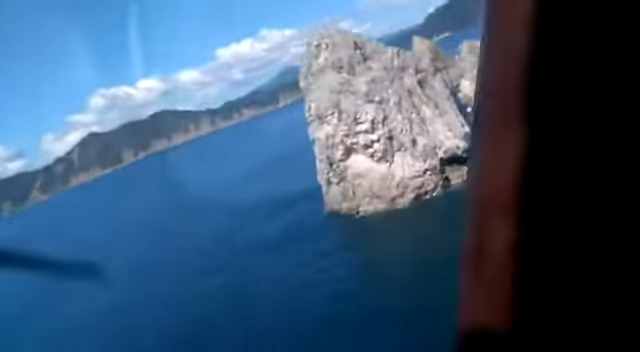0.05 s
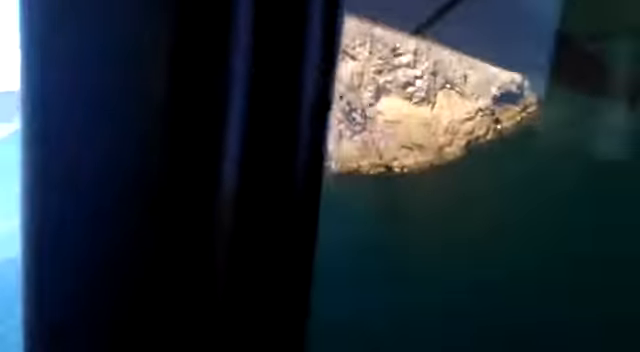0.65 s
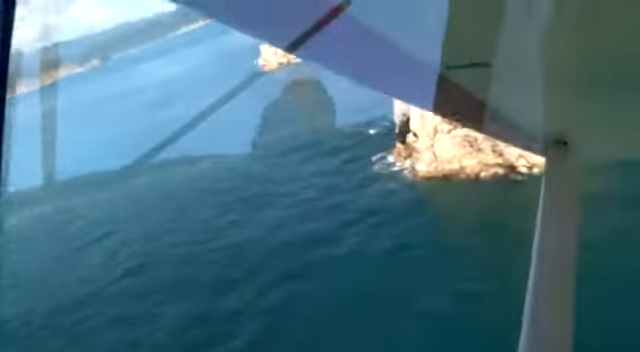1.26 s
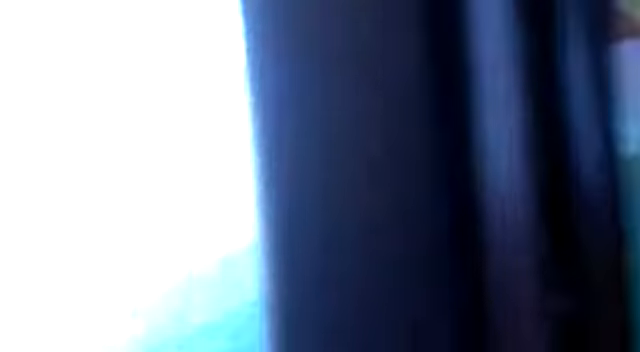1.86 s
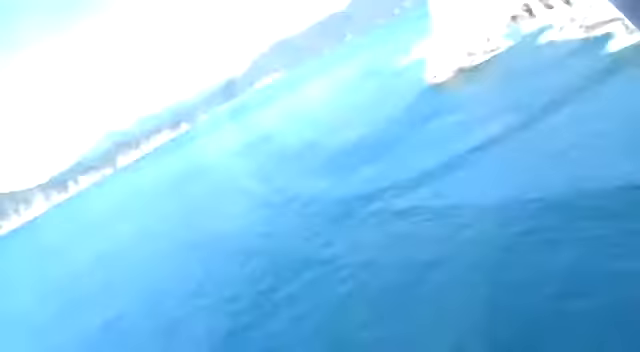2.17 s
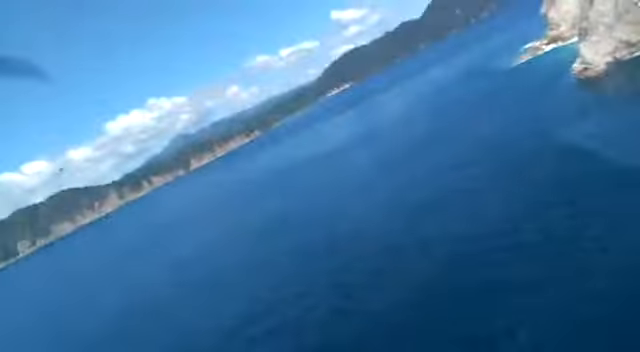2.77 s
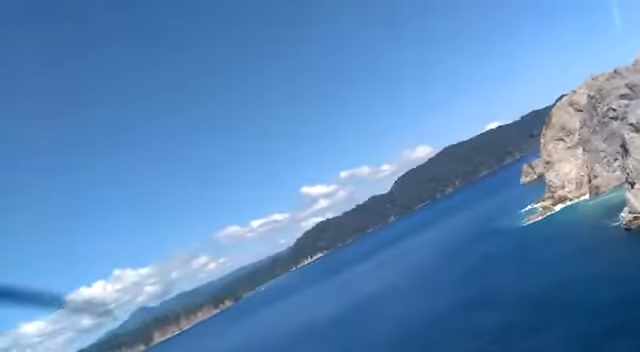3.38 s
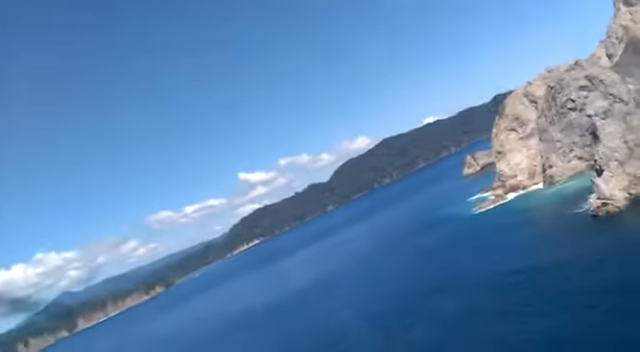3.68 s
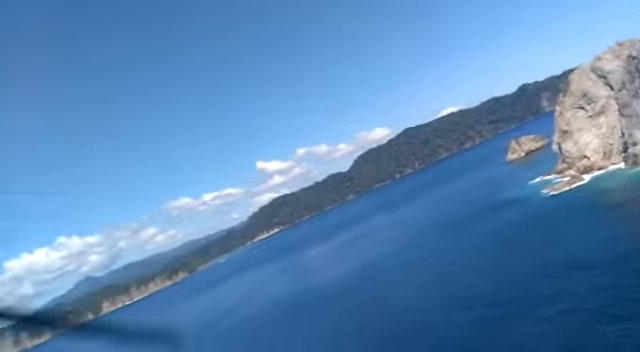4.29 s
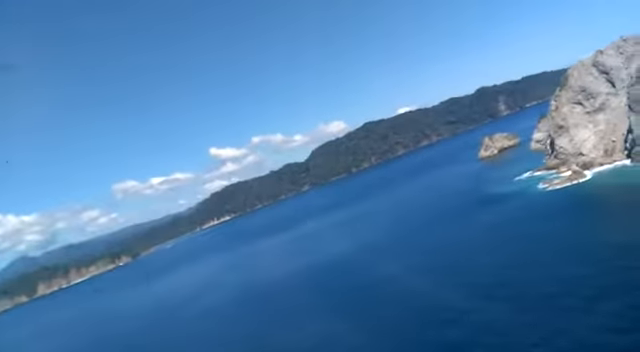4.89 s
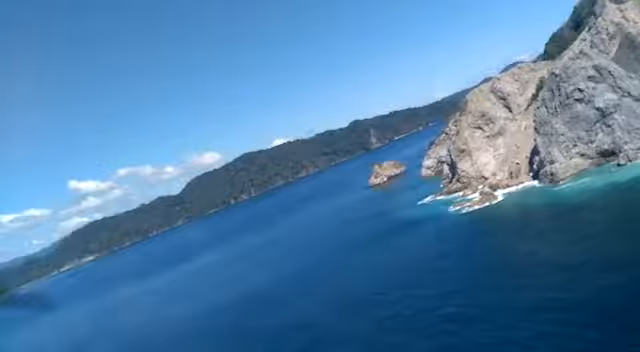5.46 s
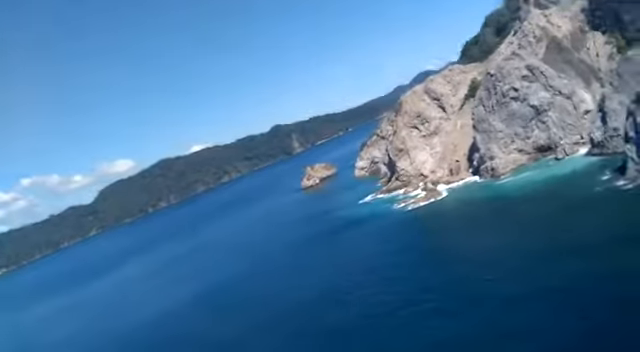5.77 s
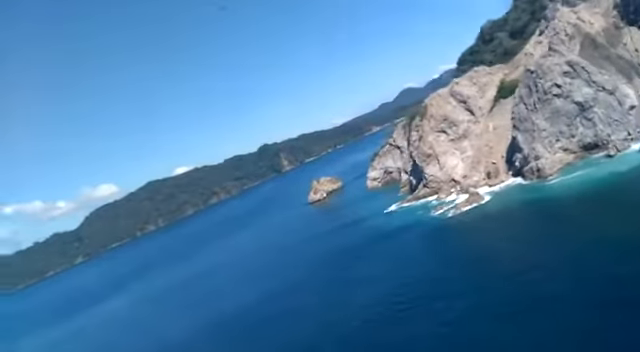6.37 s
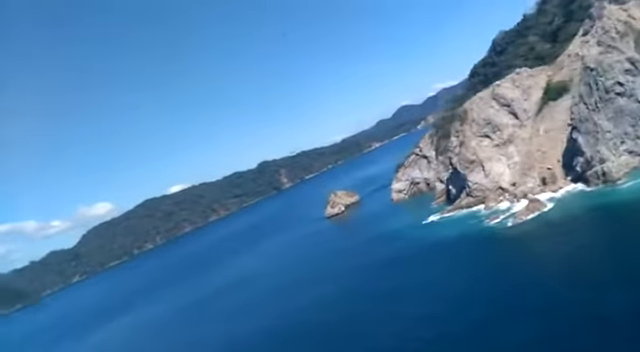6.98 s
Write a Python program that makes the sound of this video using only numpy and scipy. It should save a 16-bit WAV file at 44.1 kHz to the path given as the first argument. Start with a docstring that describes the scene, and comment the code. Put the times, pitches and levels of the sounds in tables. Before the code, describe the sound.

Loud, steady propeller drone heard from inside a light aircraft, with fluttering air rush against the cabin and a faint window hiss.

```python
"""Inside a light aircraft in a banked cruise. From the start a four-cylinder engine and its propeller
boom through the cabin's standing waves, propeller wash buffets the skin and a thin whine comes and goes.
Near 2.2 s the wash slaps hardest and the exhaust rasp drops away. By 2.6 s the microphone has swung to a
second window, where the seal hisses louder, and the rasp returns. The engine speed sags slightly to the
end. Throughout, a fast limiter holds the peaks down."""
import sys
import numpy as np
from scipy import signal
from scipy.io import wavfile
from scipy.ndimage import uniform_filter1d, minimum_filter1d

SR = 44100
rng = np.random.default_rng(int(sys.argv[2]) if len(sys.argv) > 2 else 0)


def to_wav(s):
    """Save 16-bit WAV."""
    ch = np.atleast_2d(s).T  # columns
    pcm = np.round(np.clip(ch, -1, 1) * 32767)  # PCM
    wavfile.write(sys.argv[1], SR, pcm.astype(np.int16))


N = 319284

# engine firing rate: t/s, f/Hz
FIRING_RATE = [(0, 77.35), (1, 77.3), (2, 76.7), (3, 76.3), (4, 75.95), (5, 75.8), (6, 75.55), (7.24, 75.1)]
# coherence of the cabin's sound field: f/Hz, left-right correlation/1
COHERENCE = [(30, 0.84), (70, 0.8), (170, 0.95), (270, 0.94), (450, 0.7), (740, 0.29), (1200, -0.22),
             (2000, -0.019), (15000, -0.012)]
# swing of the low rumble: t/s, level/dB
RUMBLE_SWING = [(0.0, 1.0), (0.2, 1), (0.68, -4.5), (1.04, 1), (1.44, -3), (2.8, -3.5), (2.92, -1),
                (3.48, 0), (3.76, -4.5), (5.16, 0), (5.32, -6), (5.48, -0.5), (6.04, -1.5), (6.32, -1),
                (6.72, -0.5), (6.88, 1), (7.08, -0.5), (7.24, 1)]


def boom(firings, window, second_db=-27, rumble_follow=2.2, fourth_db=(-45, -16.5)):
    """Standing waves: the lowest four firing harmonics swell and fade as the microphone crosses them."""
    # fundamental: t/s, level/dB
    fundamental = [(0.0, -14.5), (0.92, -13), (1.24, -16.5), (1.36, -16), (2.4, -5.5), (2.52, -11),
                   (3.44, -12), (3.52, -21), (3.64, -9.5), (3.96, -16.5), (4.08, -8.5), (5.92, -9),
                   (6.08, -1.5), (6.2, -12), (6.72, -6), (6.92, -10), (7.12, -8.5), (7.24, -10.5)]
    # third harmonic: t/s, level/dB
    third = [(0.0, -7), (1.12, -12), (1.2, -8.5), (1.76, -9.5), (2.28, -14), (2.6, -11.5), (3.84, -14),
             (4.08, -29), (4.2, -9), (4.36, -30), (4.44, -13), (4.64, -20), (4.88, -9), (5.6, -17),
             (5.84, -11.5), (6.04, -16.5), (7.0, -10.5), (7.24, -22)]
    flutter_db, wander_db = 1.5, 1.25
    levels_db = [in_time(fundamental)[0],
                 second_db + rumble_follow * in_time(RUMBLE_SWING)[0] + wander_db * drift(2.5),
                 in_time(third)[0],
                 np.interp(window, [0, 1], fourth_db) + wander_db * drift(2.2)]
    out = 0
    for k, level_db in enumerate(levels_db, 1):
        gain = from_db(level_db + flutter_db * drift(10.0))
        out = out + gain * np.sin(2 * np.pi * (k * firings + rng.random()))
    return np.sqrt(2) * out


def lope(firings, flutter_db=3.0, scatter_rad=0.38, count=58):
    """Subharmonics: unequal cylinders repeat every fourth firing, adding tones between the harmonics."""
    # spectral envelope of these tones: f/Hz, level/dB
    spectrum = [(19, -29), (38, -34), (57, -24.5), (95, -26.5), (135, -24.5), (170, -36.5), (210, -24.5),
                (250, -27), (290, -28.5), (360, -31), (400, -25.5), (480, -34.5), (570, -31), (800, -39),
                (900, -37.5), (1100, -49.5)]
    out = 0
    for k in range(1, count):
        if k % 4:
            hz = k * FIRING_RATE[0][1] / 4
            phase = 2 * np.pi * (k * firings / 4 + rng.random())
            gain = from_db(at_hz(spectrum, hz)[0] + flutter_db * drift(0.97))
            out = out + gain * np.sin(phase + scatter_rad * drift(7.6))
    return out


def exhaust_rasp(firings, flutter_db=2.46, scatter_rad=0.32):
    """Multipath interference: high harmonics flutter and reach each channel in a phase of its own."""
    # exhaust harmonics at mid-scene: order/1, left level/dB, right level/dB, trend/(dB/s)
    harmonics = [(5, -15, -24, -0.18), (6, -23, -29, 0.5), (7, -26, -30.5, -1), (8, -21, -23.5, 1),
                 (9, -35, -34.5, 3.5), (10, -26.5, -26.5, -1.4), (11, -35, -39, 0.5), (13, -28, -49, 1)]
    # how openly the exhaust reaches the microphone: t/s, gain/dB
    exposure = [(0, -1), (1.2, -10.5), (2.0, -8), (2.35, -30), (2.7, -1.5), (4, 0), (5.5, -0.5), (7.24, 0)]
    out, from_middle_s = 0, (np.arange(N) - N / 2) / SR
    for k, left_db, right_db, trend in harmonics:
        coherence = at_hz(COHERENCE, k * FIRING_RATE[0][1])
        phase_gap = np.arccos(coherence) * rng.choice([-1, 1])
        phase = 2 * np.pi * (k * firings + rng.random()) + scatter_rad * drift(19.0)
        gain = from_db([[left_db], [right_db]]) * from_db(trend * from_middle_s + flutter_db * drift(6))
        out = out + gain * np.sin(phase + phase_gap * [[.5], [-.5]])
    return np.sqrt(2) * from_db(in_time(exposure)[0]) * out


def slipstream(flow_db, throb_db, window, patchy_db=2.13, count=30):
    """Boundary-layer noise: turbulence on the skin drives bands that each flicker on their own."""
    # air noise at the first window: f/Hz, left and right spectrum level/dB in 1 Hz
    first_spectrum = [(32, -58, -54), (55, -61, -62), (100, -40.5, -50), (200, -40, -34), (314, -50, -43),
                      (424, -38.5, -42.5), (730, -45.5, -48), (1040, -49, -58.5), (1290, -52, -57),
                      (1960, -65.5, -61.5), (3380, -69.5, -67), (4400, -66, -68.5), (5130, -75.5, -66.5),
                      (7450, -77.5, -82.5), (15500, -89, -94)]
    # air noise at the second window: f/Hz, left and right spectrum level/dB in 1 Hz
    second_spectrum = [(32, -67, -51), (55, -37, -28.5), (100, -38.5, -40), (243, -33, -35),
                       (494, -42, -52.5), (610, -43, -43), (860, -48, -56.5), (1164, -52, -56),
                       (2020, -67, -64.5), (2970, -71, -63.5), (3480, -69.5, -69.5), (5320, -76, -65.5),
                       (8250, -76, -80), (11000, -81.5, -84.5), (15500, -88.5, -96)]
    # the four registers: rumble, roar, rush, hiss
    register_hz, throb_depth = [280, 600, 2200, 7000], [0.39, 0.7, 0.64, 0.48]
    edges = np.r_[np.geomspace(25, 400, 7)[:-1], np.geomspace(400, 17000, count)]
    white, out = rng.standard_normal((2, 2, N)), 0
    for k, (low, high) in enumerate(zip(edges, edges[1:])):
        hz = np.sqrt(low * high)
        mid, side = noise_band(white[k % 2], low, high)
        coherence = at_hz(COHERENCE, hz)
        band = np.sqrt(1 + coherence) * mid + np.sqrt(1 - coherence) * side * [[1], [-1]]
        first, second = from_db(at_hz(first_spectrum, hz)), from_db(at_hz(second_spectrum, hz))
        density = (1 - window) * first + window * second
        # each band follows its nearest registers
        shares = np.array([np.interp(np.log(hz), np.log(register_hz), row) for row in np.eye(4)])
        swell_db = shares @ flow_db + shares @ throb_depth * throb_db
        flicker_db = patchy_db * (1 - .5 * shares[-1]) * drift(11.5)
        out = out + density * np.sqrt(high - low) * from_db(swell_db + flicker_db) * band
    return out


def flow_levels(leak_db, eddy_db=1.24):
    """Flow noise grows with the flow: swings in dB of roar, rush and hiss, and the rumble's own swing."""
    # strength of the airflow over the skin: t/s, level/dB
    airflow = [(0.0, 0), (0.72, 2), (0.8, -4.5), (0.92, 2.5), (1.68, 3), (1.76, -1.5), (2.04, 3),
               (2.36, -3.5), (2.64, 0), (3.0, -1.5), (3.08, 2.5), (3.88, 0), (4.64, -1), (4.76, 4.5),
               (4.88, -1), (5.56, 0), (5.84, 0.5), (7.24, 3)]
    flow_db = in_time(airflow)[0] + eddy_db * drift(0.9)
    rumble_db = in_time(RUMBLE_SWING)[0] - 0.5
    roar_db = 0.97 * flow_db - 1.0
    rush_db = 0.72 * flow_db
    hiss_db = 0.55 * flow_db + 0.26 * (leak_db - leak_db.mean())
    return np.array([rumble_db, roar_db, rush_db, hiss_db])


def buffeting(firings, crank_rad=1.75, blade_db=0.57, double_db=4.0, gust_db=3.0):
    """Amplitude modulation, in dB, of air noise by engine cycle, blade wakes, turbulence and slaps."""
    # throb at the engine cycle: t/s, signed depth/dB
    cycle_depth = [(0, -0.4), (1.7, 0.3), (2.22, 7.5), (2.4, 11), (2.55, 3.5), (7.24, -4.5)]
    phase = 2 * np.pi * firings
    cycle_db = in_time(cycle_depth)[0] * np.cos(phase / 4 + crank_rad)
    wake_db = blade_db * np.cos(phase) + double_db * np.cos(2 * phase)
    return cycle_db + wake_db + gust_db * drift(78) + slaps()


def slaps(lull_db=6.0, decay_s=0.0097):
    """Unsteady loading: the propeller wash slackens, then hits the skin; a modulation in dB."""
    # the hardest slaps: t/s, lift/dB
    hits = [(0.318, 0), (0.833, 6), (1.071, 7), (1.327, 5.5), (1.569, -3), (1.817, 2), (1.985, 9),
            (2.248, 21), (2.458, 13), (3.04, 8), (3.303, 14), (5.894, -1), (6.161, 13), (6.349, 2),
            (6.692, 9), (6.904, 5)]
    out, reach = np.zeros(N), int(.1 * SR)
    age = np.arange(-reach, reach) / SR
    fade = np.exp(-np.abs(age) / decay_s)
    for s, lift_db in hits:
        at = round(s * SR)
        out[at - reach:at + reach] += fade * np.where(age < 0, -lull_db, lift_db)
    return uniform_filter1d(out, size=60)


def seal_hiss(leak_db, window, flutter_db=2.0, left_db=-17, right_db=2.0, distance_db=-9):
    """Resonance: air leaking past the second window excites a few fluttering peaks, on the right."""
    # resonances of the leak: f/Hz, bandwidth/Hz, relative level/dB
    resonances = [(4960, 760, -5), (5070, 310, -4.5), (5550, 270, -1), (6030, 780, -10)]
    hiss = 0
    for hz, width, level_db in resonances:
        gain = from_db(level_db + flutter_db * drift(24))
        hiss = hiss + gain * noise_band(rng.standard_normal((2, N)), hz - width / 2, hz + width / 2)
    return from_db([[left_db], [right_db]]) * from_db(leak_db + distance_db * (2 - window)) * hiss


def cabin_reflections(air, echo_gain=.16, sway_s=.0002, count=3):
    """Comb filtering: glass and panels reflect the treble along paths that sway with the hand."""
    treble = signal.sosfilt(signal.butter(2, 900, "high", fs=SR, output="sos"), air)
    n, out = np.arange(N), air.copy()
    for channel in range(2):
        for lag_s in rng.uniform(.002, .007, count):
            delay = SR * (lag_s + sway_s * drift(0.65))
            out[channel] += echo_gain * np.interp(n - delay, n, treble[channel])
    return out


def whistles():
    """Flow-excited resonance: gusts blow across gaps in the frame, each band swelling and dying."""
    # gusts: t/s, duration/s, f/Hz, bandwidth/Hz, left level/dB, right level/dB
    gusts = [(0.146, 0.39, 2060, 700, -22.5, -50), (1.1, .2, 2360, 810, -51, -33),
             (1.18, 0.29, 670, 260, -18, -23), (1.63, .05, 4860, 200, -35, -55),
             (2.353, 0.09, 2630, 400, -27, -50), (2.462, 0.11, 2670, 800, -33, -50),
             (3.094, 0.034, 5120, 200, -55, -28), (3.334, .05, 4300, 800, -46, -24),
             (6.855, 0.034, 4570, 900, -50, -25)]
    white, out = rng.standard_normal((2, N)), 0
    for s, length_s, hz, width, left_db, right_db in gusts:
        band = noise_band(white, hz - width / 2, hz + width / 2)
        out = out + from_db([[left_db], [right_db]]) * swell(s, length_s) * band
    return out


def whine(throb_db, hz=1322, waver_hz=9, skirt_hz=130, idle_db=-33.5, flicker_db=4):
    """Random frequency modulation: a thin tone wavers in a skirt of noise, flaring and changing sides."""
    # short flares: t/s, duration/s, level/dB
    flares = [(0.036, 0.29, -23.5), (0.27, 0.097, -15.5), (0.508, 0.065, -18.5), (0.73, 0.057, -18.5),
              (1.013, 0.073, -22), (1.15, 0.048, -23), (1.995, 0.12, -26), (2.167, 0.043, -24),
              (2.475, .07, -26), (3.53, .07, -20.5), (4.812, 0.031, -16), (5.258, 0.23, -20.5),
              (5.597, .09, -20), (6.85, 0.094, -22), (7.087, 0.059, -17)]
    # balance: t/s, left minus right level/dB
    balance = [(0, -23), (0.75, -17), (1.0, 14), (2.0, 16), (2.2, -2), (6.1, 6), (7.0, -6)]
    level = from_db(idle_db + flicker_db * drift(8.2))
    for s, length_s, flare_db in flares:
        level = np.maximum(level, from_db(flare_db) * swell(s, length_s))
    pan = from_db(in_time(balance)[0] * [[.5], [-.5]])
    pan = pan / np.sqrt(np.mean(pan ** 2, axis=0))  # constant power
    pitch = hz + waver_hz * np.array([drift(18.4), drift(19.2)])
    tone = np.sqrt(2) * np.sin(2 * np.pi * np.cumsum(pitch, axis=1) / SR)
    skirt = noise_band(rng.standard_normal((2, N)), hz - skirt_hz / 2, hz + skirt_hz / 2)
    return pan * level * from_db(throb_db) * (from_db(-3.5) * tone + from_db(-8.0) * skirt)


def tick(s=.911, level_db=-31, decay_s=0.0026):
    """Exponential decay: one faint, bright burst of noise."""
    age = np.arange(N) / SR - s
    envelope = (age > 0) * np.exp(-np.minimum(np.abs(age) / decay_s, 50))
    return from_db(level_db) * envelope * noise_band(rng.standard_normal((2, N)), 8000, 15000)


def from_db(db):
    """Decibels to amplitude ratio."""
    return np.exp(np.asarray(db) * (np.log(10) / 20))


def rms_one(x):
    """Normalisation to unit rms."""
    return x / np.sqrt(np.mean(x ** 2) + 1e-20)


def in_time(rows):
    """Linear interpolation of a curve's columns at every sample."""
    s, *columns = np.transpose(rows)
    return [np.interp(np.arange(N) / SR, s, c) for c in columns]


def at_hz(rows, hz):
    """Log-frequency interpolation of a spectrum's columns, as a column vector."""
    points, *columns = np.transpose(rows)
    return np.array([[np.interp(np.log(hz), np.log(points), c)] for c in columns])


def drift(corner_hz, step=40):
    """Low-passed noise: a smooth random wandering of unit rms."""
    pole = np.exp(-2 * np.pi * corner_hz * step / SR)
    white = rng.standard_normal(N // step + 2002)
    slow = signal.lfilter([1], [1, -2 * pole, pole * pole], white)[2000:]
    return np.interp(np.arange(N) / step, np.arange(len(slow)), rms_one(slow))


def noise_band(white, low, high):
    """Band-passed noise of unit rms."""
    bandpass = signal.butter(2, [low, min(high, .45 * SR)], "band", fs=SR, output="sos")
    return rms_one(signal.sosfilt(bandpass, white))


def swell(s, length_s):
    """A Gaussian envelope centred on s."""
    return np.exp(-np.minimum((2 * (np.arange(N) / SR - s) / length_s) ** 2, 50))


def scene():
    """Superposition: engine tones and throbbing air noise, paced by the one crankshaft."""
    # microphone path: t/s, position/1 (0 = first window, 1 = second)
    microphone_path = [(0, 0.15), (.9, 0.11), (2.38, 0.097), (2.55, 1), (2.9, 0.84), (7.24, 1)]
    # leak at the window seal: t/s, relative level/dB
    seal_leak = [(0.0, -23.5), (1.0, -39.5), (1.08, -35), (2.4, -35.5), (2.48, -31), (2.6, -25.5),
                 (3.0, -29), (3.2, -26), (4.36, -27.5), (4.64, -35), (4.72, -27), (6.76, -34), (6.84, -33),
                 (7.24, -35.5)]
    firings = np.cumsum(in_time(FIRING_RATE)[0] + .1 * drift(2.9)) / SR  # phase in cycles
    window = in_time(microphone_path)[0]
    leak_db = in_time(seal_leak)[0]
    throb_db = buffeting(firings)
    engine = from_db([[.1], [1.6]]) * boom(firings, window) + lope(firings)
    exhaust = exhaust_rasp(firings)
    wash = from_db(-1.39) * slipstream(flow_levels(leak_db), throb_db, window)
    air = wash + seal_hiss(leak_db + throb_db, window)
    return engine + exhaust + cabin_reflections(air) + whistles() + whine(0.79 * throb_db) + tick()


def record(dry, ceiling=1.0, release_db_per_s=340, hold_s=0.001, cutoff_hz=15700):
    """Peak limiting: the gain dips just ahead of each overshoot; a steep low-pass then cuts the top."""
    over_db = 20 * np.log10(np.maximum(np.abs(dry).max(axis=0) / ceiling, 1))
    fall_db = release_db_per_s * np.arange(N) / SR
    cut_db = np.maximum.accumulate(over_db + fall_db) - fall_db
    span = int(hold_s * SR)
    gain_db = uniform_filter1d(minimum_filter1d(-cut_db, span), span)
    lowpass = signal.ellip(12, .1, 90, cutoff_hz, fs=SR, output="sos")
    return signal.sosfilt(lowpass, dry * from_db(gain_db))


dry = scene()
out = record(dry)
to_wav(out)
```